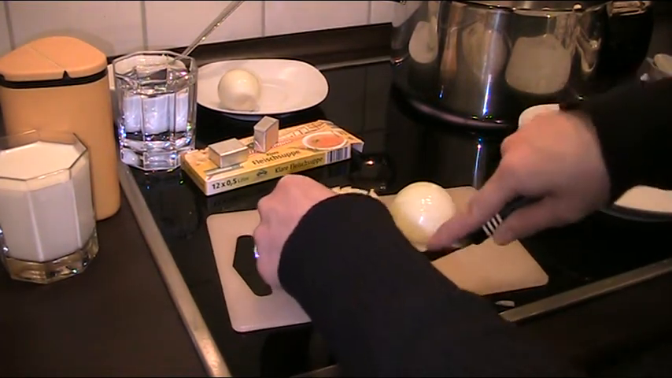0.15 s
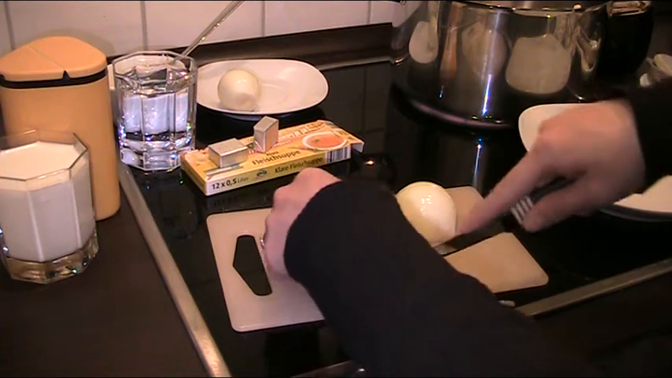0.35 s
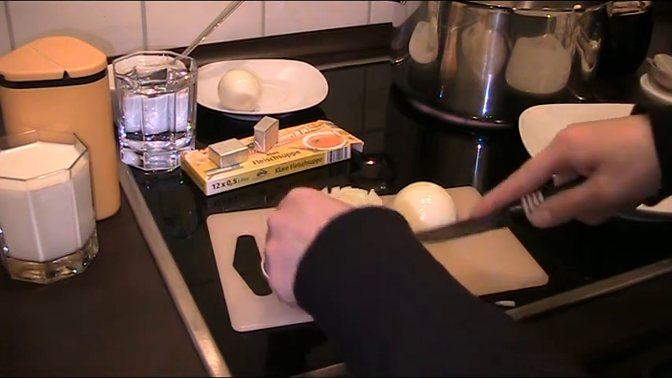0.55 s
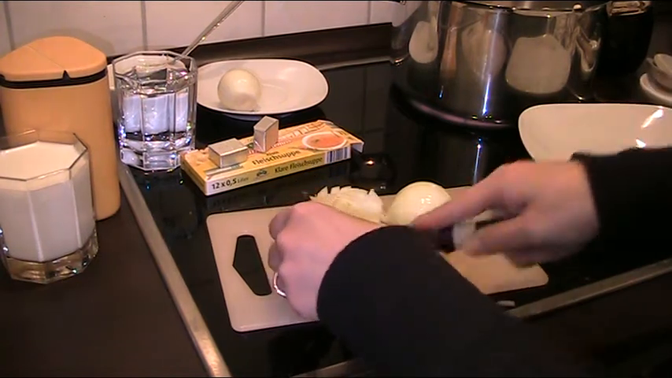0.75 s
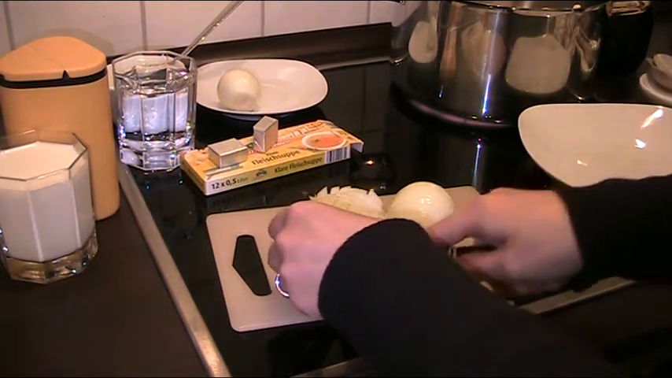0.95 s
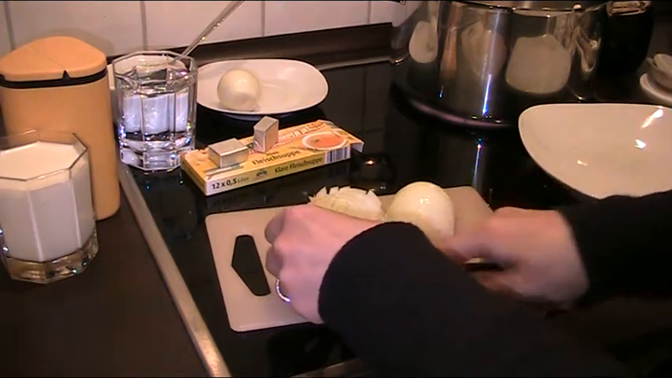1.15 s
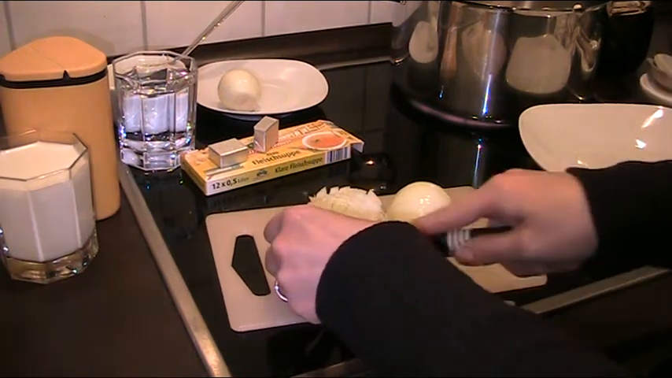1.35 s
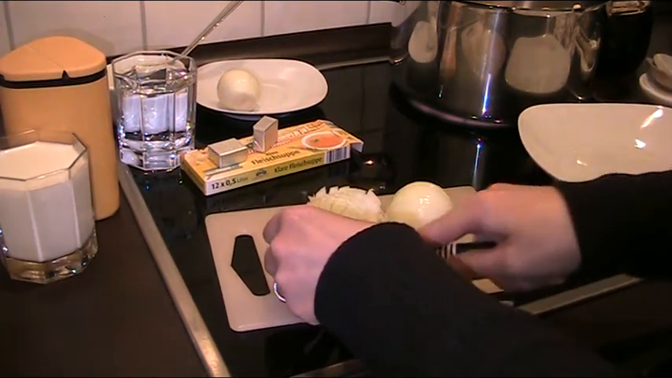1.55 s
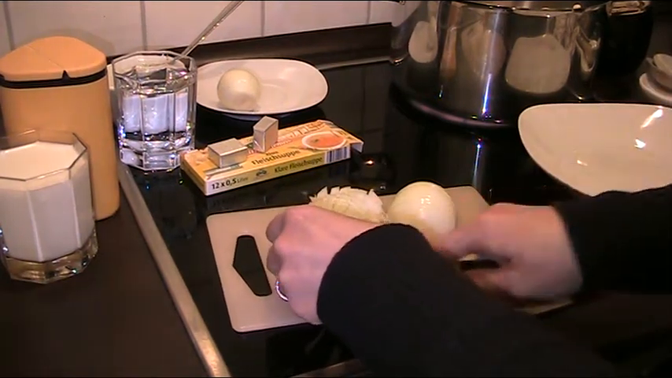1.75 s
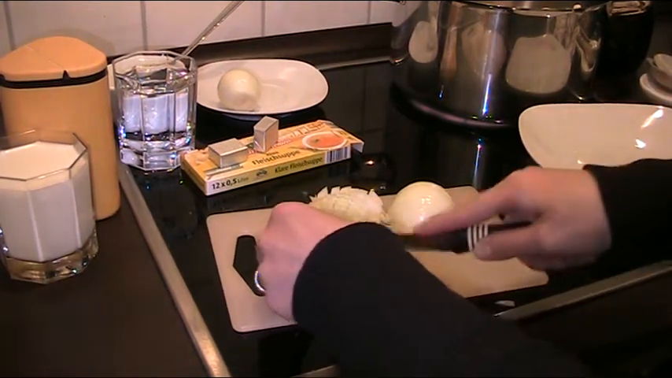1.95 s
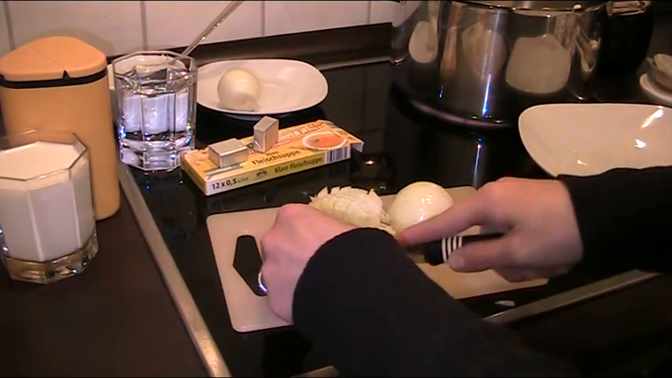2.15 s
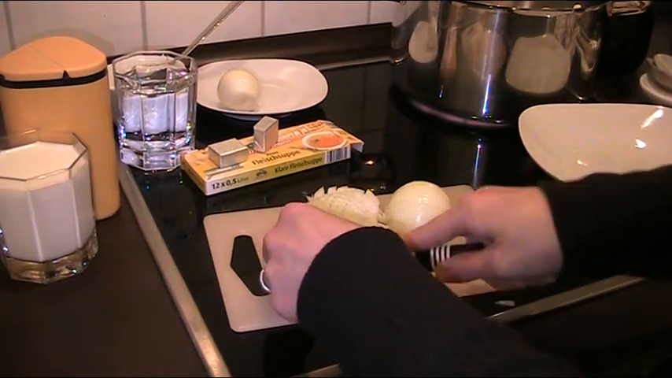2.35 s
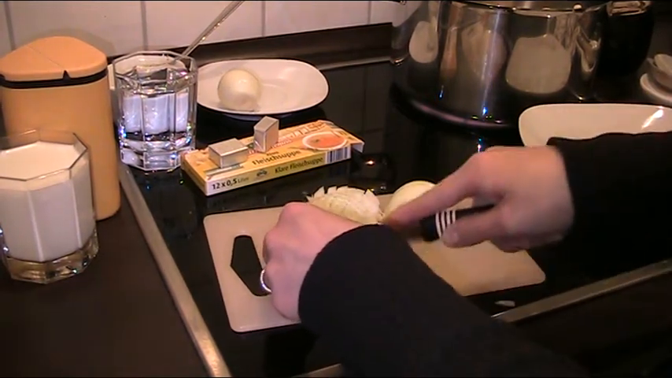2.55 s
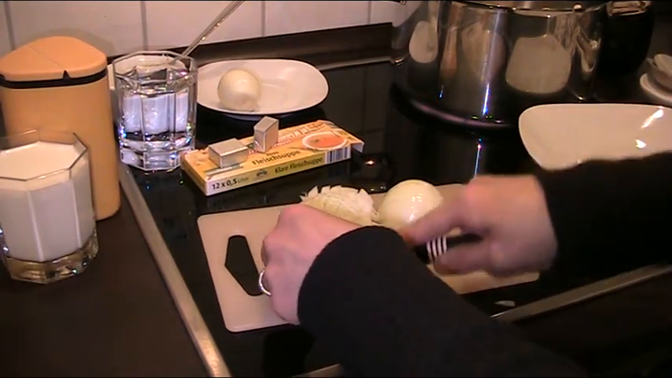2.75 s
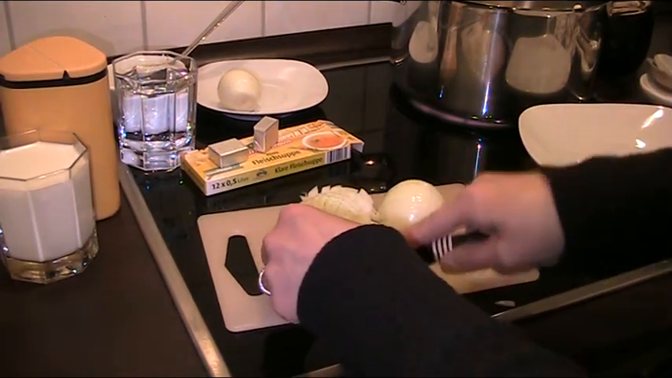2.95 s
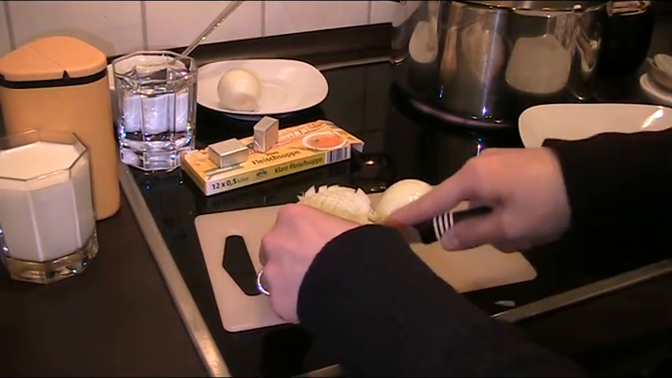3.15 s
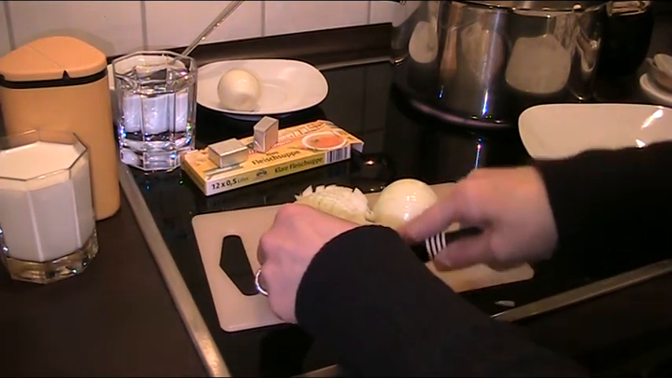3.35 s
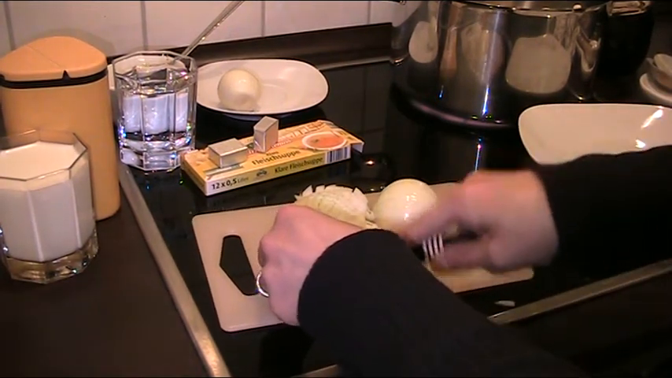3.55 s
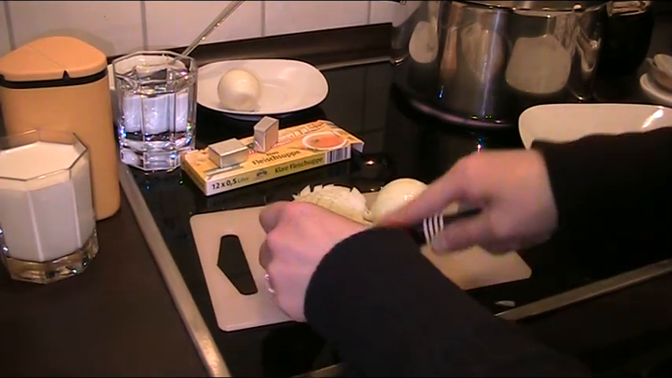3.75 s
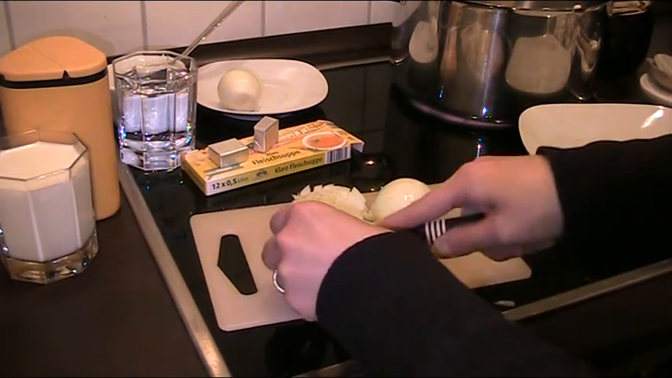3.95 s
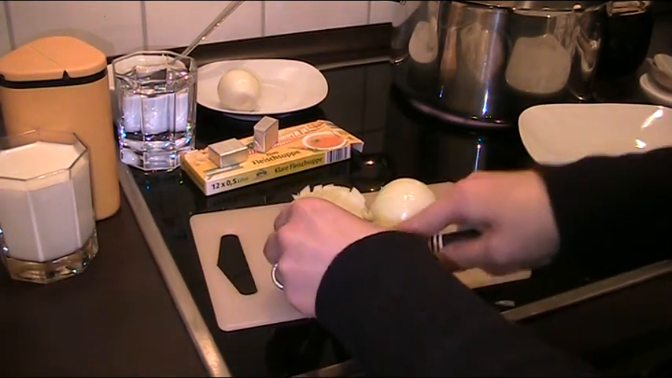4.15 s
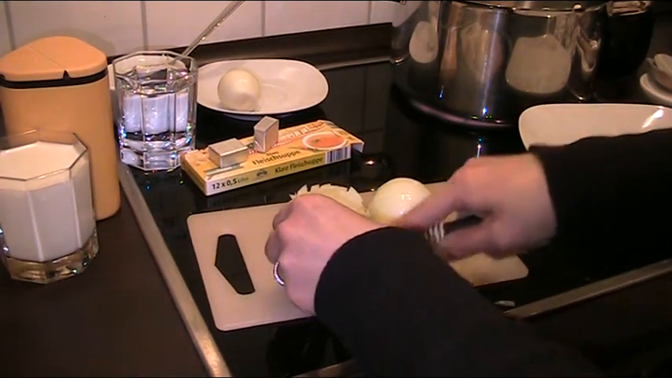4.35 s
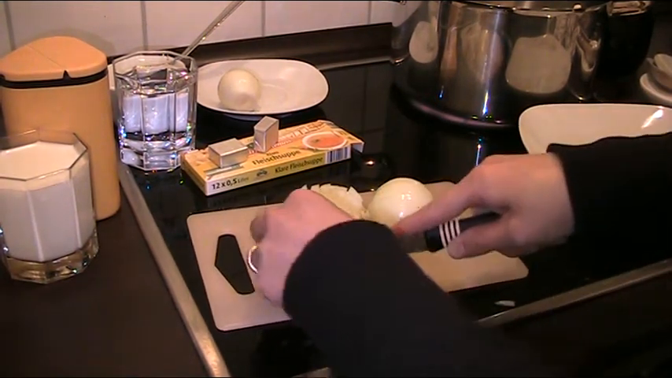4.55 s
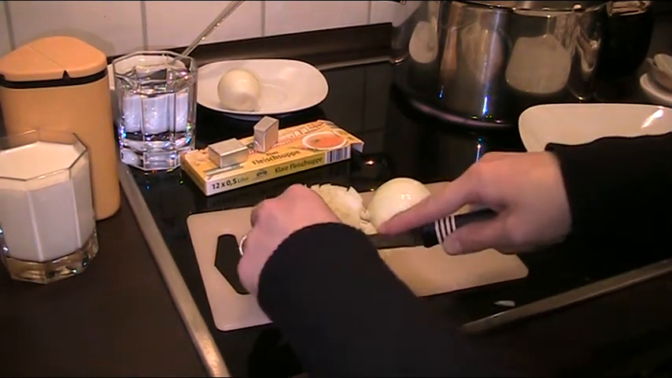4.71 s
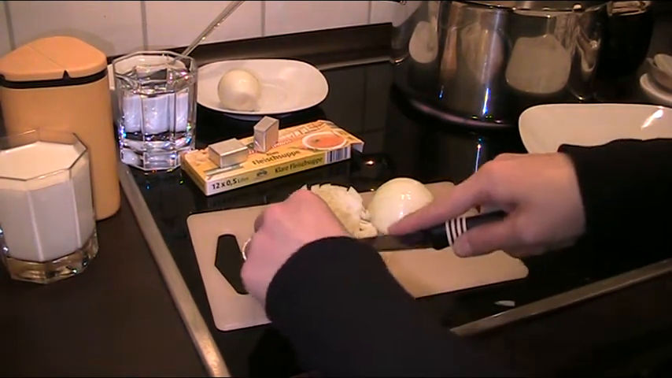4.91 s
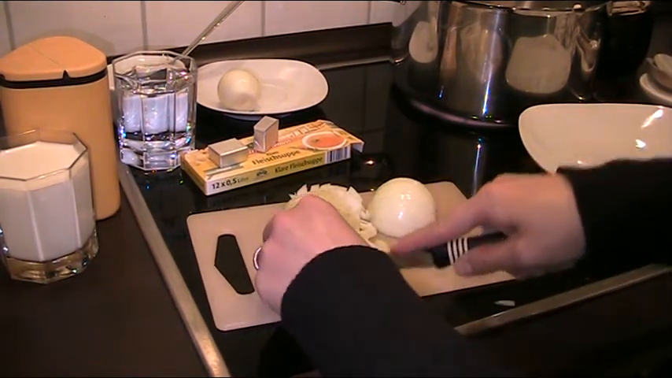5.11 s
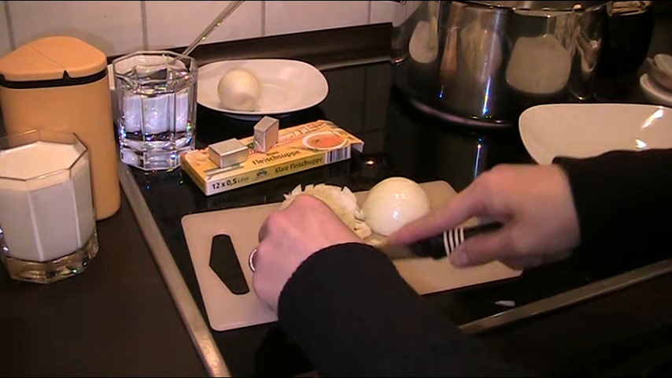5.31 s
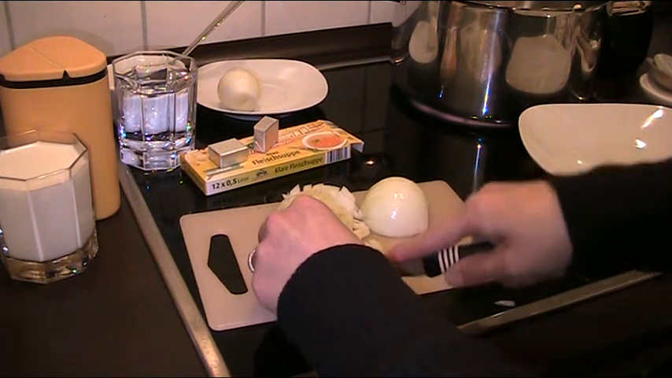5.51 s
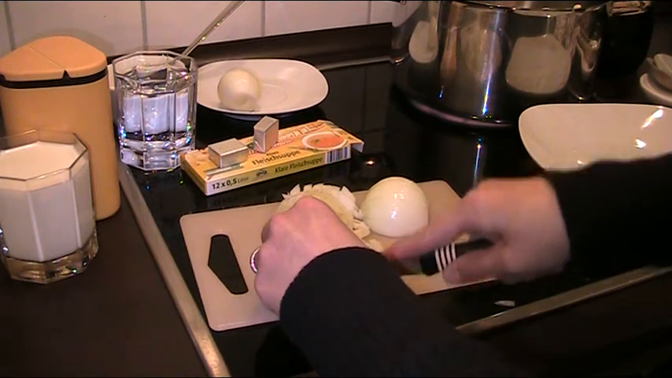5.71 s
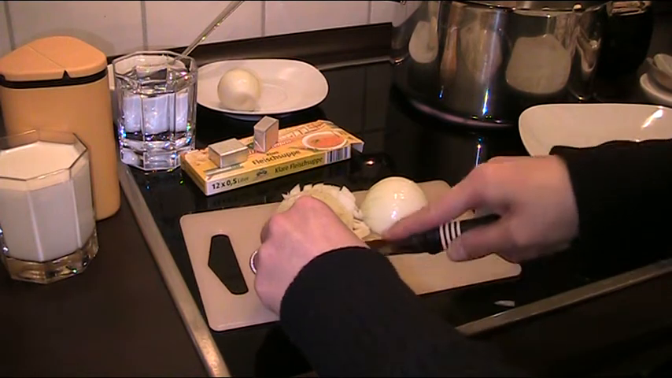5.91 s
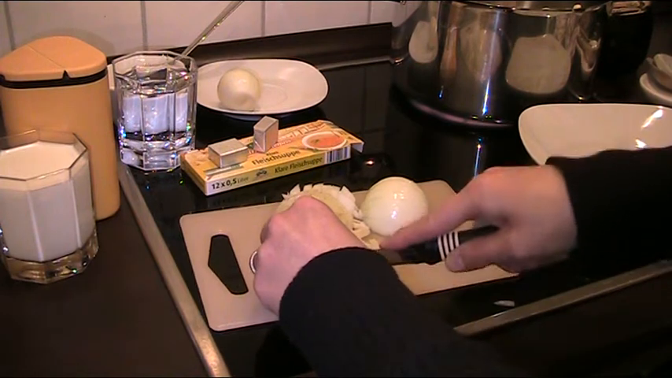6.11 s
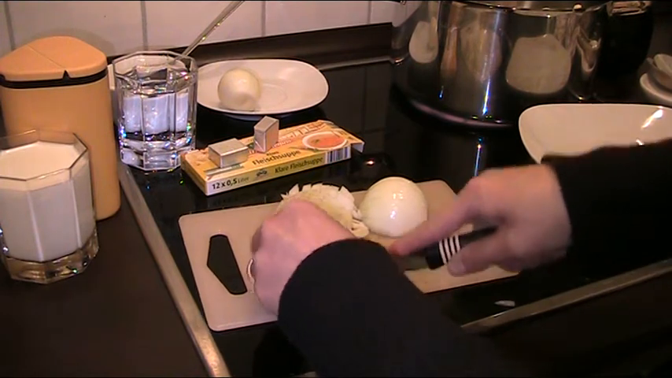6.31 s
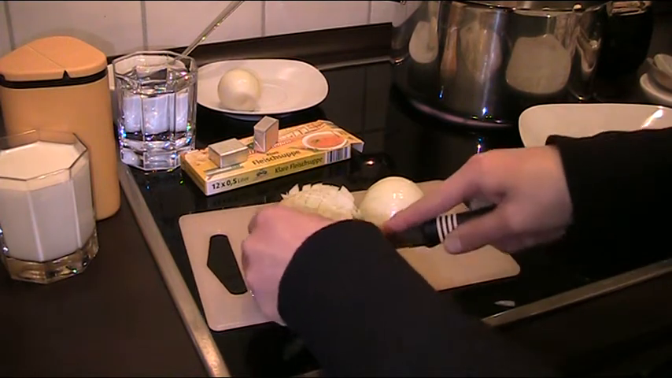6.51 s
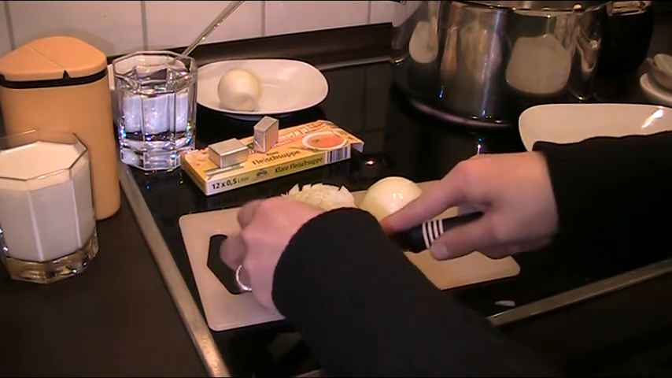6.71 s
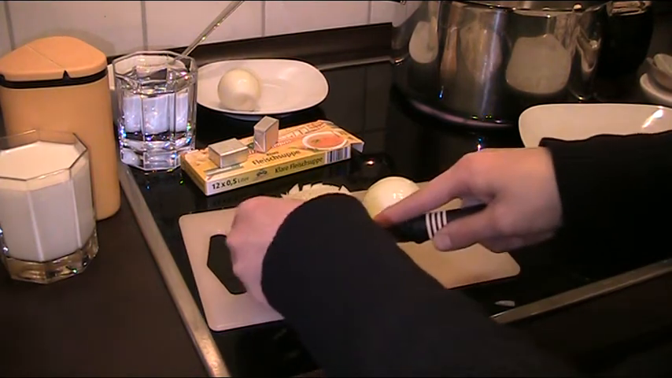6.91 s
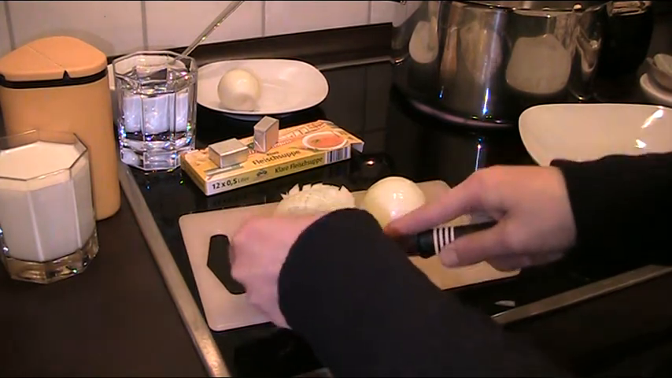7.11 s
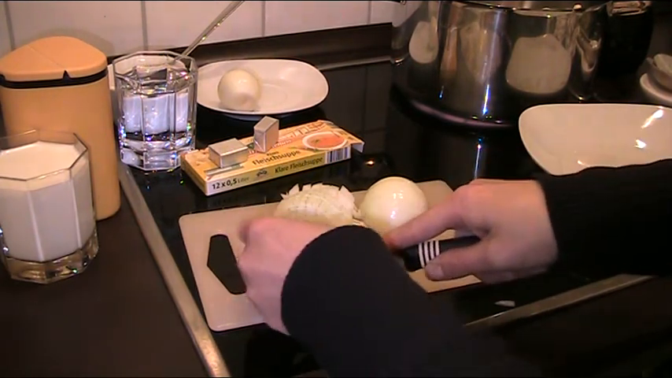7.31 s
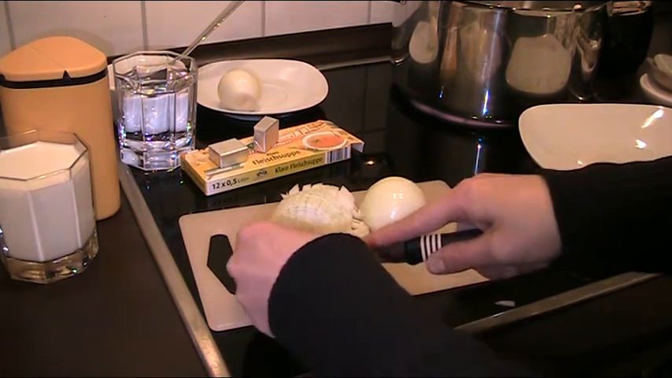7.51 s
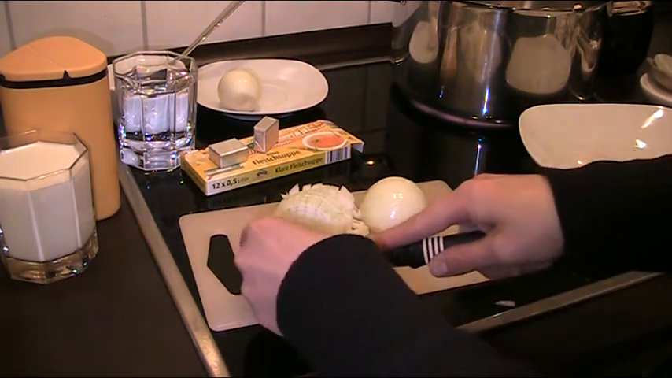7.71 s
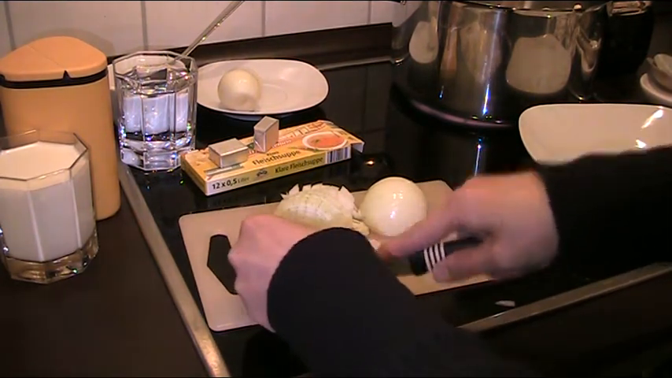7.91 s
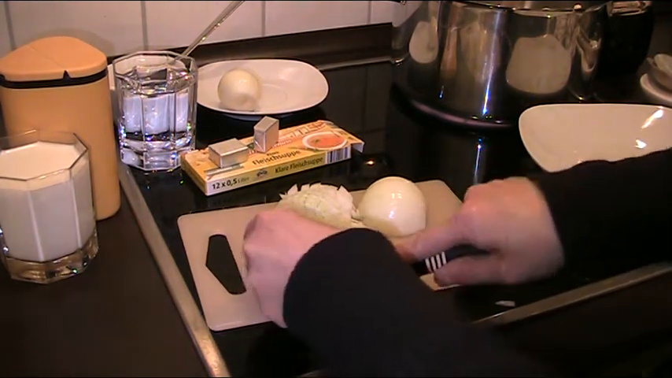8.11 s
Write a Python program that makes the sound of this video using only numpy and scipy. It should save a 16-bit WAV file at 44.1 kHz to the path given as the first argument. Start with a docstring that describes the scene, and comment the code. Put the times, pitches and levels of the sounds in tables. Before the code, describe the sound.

Crisp wet onion cuts end in short hollow knocks on a thin plastic board, with small ticks and rustles between them over faint kitchen hum.

```python
"""A kitchen knife dices an onion on a plastic board that lies on a glass hob, heard from close by.
In each cut, runs of tiny clicks crunch through three layers; then dying tones make the knock on the board.
Long tones of the hob and a low rumble ring on, and noise shaped by the sound makes the kitchen's echo.
Between cuts the blade ticks and fingers shift the pieces, as small sprays and runs of clicks.
Shaped noise gives a faint hiss; steady sine tones give a mains hum and an appliance that soon stops."""
import sys
import numpy as np
from scipy import signal
from scipy.fft import rfft, irfft, next_fast_len
from scipy.io import wavfile
from scipy.ndimage import uniform_filter1d

SR = 44100
rng = np.random.default_rng(int(sys.argv[2]) if len(sys.argv) > 2 else 0)


def output_pcm(signal):
    """Save a mono or channel-first signal as 16-bit PCM at the path in sys.argv[1].

    Samples are clipped to [-1, 1] before scaling.
    """
    pcm = np.clip(np.atleast_2d(signal).T, -1, 1) * 32767
    wavfile.write(sys.argv[1], SR, np.round(pcm).astype(np.int16))


N = 364697  # length in samples

# The colour of one bursting onion cell. Each row: frequency in Hz, relative level in dB.
CELL_COLOUR = [(30, -0.5), (200, -15), (600, 2), (1300, 7.5), (2100, 3), (2700, -2.5), (4000, 1.5),
               (4900, -5), (6300, -2), (8800, -2), (10500, -13.5), (15500, -22.5)]
# The blade chops through the onion and lands on the board. Each row: landing in seconds, force in dB,
# pitch as a factor on the board's tones, extra weight of the low thud in dB, travel through the onion
# in seconds, crunch of the last layer in dB, growth from layer to layer in dB.
CHOPS = [(0.0359, -8.5, 0.84, 5, 0.034, -34.5, 18), (0.3996, -11.5, 0.9, -2.5, .05, -43, 9),
         (1.0793, -10.5, 1.02, 2, .03, -42.5, 10), (1.6972, -8.5, 1.086, 1.5, .03, -36, 14),
         (2.2825, -4, 1.065, 0, 0.036, -35, 4), (2.6213, -1.5, 1.08, -1, 0.029, -37, 3.5),
         (2.9387, 1.5, 1.096, -3, .036, -28, 8), (3.2435, 1.5, 1.053, -3, 0.05, -25.5, 10),
         (3.5475, 1, 1.037, -2, 0.063, -25.5, 10.5), (4.1683, -2.5, 1.05, -.5, .057, -25.5, 8),
         (5.1228, -1.5, 1, -2, .036, -35.5, 3), (5.4176, -13, 1.03, 4.5, 0.059, -30.5, 11),
         (5.675, -26.5, 0.79, 13.5, 0.039, -44.5, 11), (6.1528, 4, 1.016, -2.5, 0.057, -22.5, 19),
         (7.8982, -4.5, 0.99, 1, 0.052, -27, 16.5)]


def amp(db):
    """Turns decibels into a gain."""
    return 10 ** (np.asarray(db) / 20)


def evened(x):
    """Scales a sound to an rms level of 1."""
    return x / np.sqrt(np.mean(x ** 2) + 1e-20)


def read(points, hz):
    """Reads a table between its points, along a logarithmic frequency axis."""
    f, value = np.transpose(points)
    return np.interp(np.log(hz + 1), np.log(f + 1), value)


def add(mix, s, sound):
    """Mixes a sound in at time s in seconds."""
    part = mix[max(round(s * SR), 0):][:len(sound)]
    part += sound[:len(part)]


def tint(x, points):
    """Colours a sound by raising or lowering each frequency as the table says."""
    size = next_fast_len(len(x))
    gain = amp(read(points, np.fft.rfftfreq(size, 1 / SR)))
    return irfft(rfft(x, size) * gain, size)[:len(x)]


def click(points, size=1024):
    """The most compact click with a given colour: minimum phase, of energy 1."""
    log_gain = np.log(amp(read(points, abs(np.fft.fftfreq(size, 1 / SR)))))
    pulse = np.fft.ifft(np.exp(np.conj(signal.hilbert(log_gain)))).real
    return pulse / np.linalg.norm(pulse)


def ring(modes, length, contact, pitch=1, thud_db=0):
    """A struck thing sounds as dying tones, which set in over a short contact time in seconds."""
    t = np.arange(int(length * SR)) / SR
    waves = np.zeros(len(t))
    for hz, db, t60 in modes:
        level_db = db + thud_db * (hz < 1000)  # the thud is what lies below 1000 Hz
        decay = np.exp(-np.log(1000) * t / t60)
        waves += amp(level_db) * decay * np.cos(2 * np.pi * hz * pitch * t)
    return waves * (1 - np.exp(-t / contact))


def bursts(length, per_s, spread_db, edge, swell_db=0, clump_db=0):
    """A run of random tiny clicks, a few much larger than the rest, with swells of about 2 ms."""
    count = int(length * SR)
    chance, size, sign, clumps = rng.random((count, 4)).T
    sizes_db = spread_db * np.minimum(-np.log(1 - size), 4)
    sizes_db += clump_db * evened(uniform_filter1d(clumps - .5, size=100))
    sizes_db += np.linspace(0, swell_db, count)
    train = (chance < per_s / SR) * amp(sizes_db) * np.sign(sign - .5)
    return evened(train * signal.windows.tukey(count, edge))


def background():
    """Mid and side of the hiss, with mains hum and the steady tone of an appliance that soon fades out."""
    # Colour of the hiss. Each row: frequency in Hz, relative level in dB per Hz.
    hiss_colour = [(15, -39), (25, -3), (55, -2.5), (96, -6.5), (204, 1), (684, -6.5), (782, -4),
                   (1020, -10.5), (1750, -11), (2850, -14), (3340, -14.5), (5430, -19), (8350, -18),
                   (10100, -25.5), (15500, -31.5)]
    # Width of the hiss. Each row: frequency in Hz, side against mid in dB.
    hiss_width = [(25, 2.5), (60, -0.5), (300, 0.5), (1000, 3.5), (4000, 2), (12000, -0.5)]
    # Tones of the hum. Each row: frequency in Hz, rms level in dB.
    hum_tones = [(49.3, -72.5), (100, -72.5), (247.6, -77), (366.1, -74.5), (495.3, -76.5), (786, -76.5)]
    hiss_db = -60
    drone_hz, drone_db, stop_s, drone_t60_s = 310, -61.5, 2.2, .7
    t = np.arange(N) / SR
    mid, side = (amp(hiss_db) * evened(tint(noise, hiss_colour)) for noise in rng.standard_normal((2, N)))
    hum = sum(amp(db) * np.sin(2 * np.pi * (hz * t + rng.random())) for hz, db in hum_tones)
    fade = np.exp(-np.log(1000) * np.maximum(t - stop_s, 0) / drone_t60_s)
    drone = amp(drone_db) * fade * np.sin(2 * np.pi * drone_hz * t)
    return mid + np.sqrt(2) * (hum + drone), tint(side, hiss_width)  # root 2 turns rms into peak


def clack(pitch, thud_db, contact, low_hz=170):
    """The board's short answer to one blow; so small a plate radiates little bass."""
    # Tones of the board, damped by hand and onion.
    # Each row: frequency in Hz at pitch 1, relative level in dB, time to fall by 60 dB in seconds.
    board_modes = [(436, -8.5, 0.017), (940, -25.5, .012), (1364, -24, 0.021), (1695, 1, 0.0089),
                   (1824, -3.5, 0.003), (2170, -61.5, 0.0075), (3360, -16.5, 0.012), (4187, -51.5, 0.0032),
                   (8600, -26.5, .003)]
    high_pass = signal.butter(2, low_hz, "high", fs=SR, output="sos")
    return signal.sosfilt(high_pass, ring(board_modes, .04, contact, pitch, thud_db))


def crunch_rows():
    """Each broken layer or slice: start s, length s, level dB, board share dB, swell dB."""
    # Three layers break in every chop: the outer two crack and die, the last swells into the landing.
    # Each row: share of the travel still to go, length in seconds, share that shakes the board in dB,
    # swell from start to end in dB.
    layers = [(1.0, .011, 3.5, -5), (.74, .012, 1, -3.5), (.24, 0.01593, -2, 7)]
    # The blade is pushed slowly through the flesh. Each row: start in seconds, length in seconds,
    # level in dB, share that shakes the board in dB.
    slow_slices = [(.227, 0.017, -46, 5), (0.418, 0.034, -38, 5), (0.928, 0.04, -43, 1),
                   (0.99, 0.043, -36.5, -0.5), (1.541, 0.048, -43, -3.5), (1.576, 0.065, -36, -4.5)]
    slice_swell_db = 2.5  # a slow slice presses a little harder towards its end
    rows = []
    for s, _, _, _, travel, crunch_db, growth_db in CHOPS:
        for layers_left, (to_go, length, board_db, swell_db) in enumerate(reversed(layers)):
            level_db = crunch_db - growth_db * layers_left
            rows.append((s - to_go * travel, length, level_db, board_db, swell_db))
    return rows + [(*row, slice_swell_db) for row in slow_slices]


def crunches():
    """Cells burst in runs amid a faint creak; the blade carries part of each burst into the board."""
    creak_lead_s, creak_db = 0.0069, -14.5  # the flesh creaks just before and after it gives way
    cells, push = np.zeros((2, N))
    for s, length, db, board_db, swell_db in crunch_rows():
        creak = bursts(length + 2 * creak_lead_s, per_s=4100, spread_db=1.5, edge=0.45)
        add(cells, s - creak_lead_s, amp(db + creak_db) * creak)
        crunch = bursts(length, per_s=4100, spread_db=1.5, edge=0.28, swell_db=swell_db, clump_db=2.5)
        add(cells, s, amp(db) * crunch)
        shake = bursts(length, per_s=3000, spread_db=0.0, edge=0.25, swell_db=swell_db / 2, clump_db=1.2)
        add(push, s, amp(db + board_db) * shake)
    body = clack(pitch=0.92, thud_db=0.5, contact=0.00096)
    wet = signal.oaconvolve(cells, click(CELL_COLOUR))[:N]
    return wet + signal.oaconvolve(push, body / np.linalg.norm(body))[:N]


def splutter(fade):
    """The wet spray of clicks that follows a contact, of energy 1; fade is in seconds."""
    spray = bursts(.02, per_s=6300, spread_db=6.5, edge=0)
    t = np.arange(len(spray)) / SR
    spray *= np.exp(-t / fade) * (1 - np.exp(-t / 0.00019))
    return spray / np.linalg.norm(spray)


def knock_rows():
    """Everything that strikes the board: time s, force dB, pitch factor, thud dB."""
    # The blade bumps the board or the onion on it without cutting through.
    # Each row: time in seconds, force in dB, pitch factor, extra weight of the low thud in dB.
    light_bumps = [(0.2159, -23, 0.76, -1), (1.8398, -26, 0.87, -9), (2.443, -20, 1.12, -10),
                   (2.7824, -25, 1, -17), (5.3747, -20, .78, 6), (6.1095, -15.5, 0.8, -5),
                   (8.1958, -26, 1, 2)]
    return [cut[:4] for cut in CHOPS] + light_bumps


def knocks():
    """Each landing gives a short hollow clack and crushes the last skin; the hob rings and rumbles under it."""
    # Long resonances of hob and room. Each row: frequency in Hz, level in dB before the shared hob_db.
    hob_modes = [(43, -52), (165, -47), (228, -45), (248, -45), (283, -45), (365, -38), (411, -40),
                 (456, -36), (697, -46), (862, -45), (1147, -45), (1202, -45), (1287, -43), (1550, -39),
                 (1599, -39), (1660, -39), (1727, -38), (1857, -38), (1963, -38), (2113, -44), (2401, -47),
                 (2809, -50)]
    # Hob and cupboard shaken by a knock. Each row: frequency in Hz, relative level in dB.
    rumble_colour = [(15, -19), (42, -3.5), (62, -10.5), (90, 1), (135, -8), (170, 0.5), (300, -8.5),
                     (900, -68)]
    hob_t60_s, hob_db = 0.54, -2
    skin_db, skin_growth = -2.5, .78  # wet snap: dB at a force of 0 dB, dB per dB of force
    board, skin, hob = np.zeros((3, N))
    t = np.arange(SR) / SR
    ringing = ring([(hz, db + hob_db, hob_t60_s) for hz, db in hob_modes], 1, contact=0.0008)
    for s, force_db, pitch, thud_db in knock_rows():
        add(board, s, amp(force_db) * clack(pitch, thud_db, contact=0.00043))
        add(skin, s, amp(skin_db + skin_growth * force_db) * splutter(fade=0.0014))
        rumble = evened(tint(rng.standard_normal(SR), rumble_colour))
        rumble *= amp(-46.5) * np.exp(-t / 0.07) * (1 - np.exp(-t / .01))
        add(hob, s, amp(force_db + thud_db / 2) * (ringing + rumble))
    return board + hob + signal.oaconvolve(skin, click(CELL_COLOUR))[:N]


def handling():
    """Wet ticks, settling crumbs and rustling pieces are runs of clicks; the blade pings once as dying tones."""
    # Light ticks of blade and onion pieces. Each row: time in seconds, strength in dB before colouring.
    light_ticks = [(.811, -21.5), (.9, -20), (1.547, -18), (3.708, -28), (4.5093, -24.5), (4.536, -21),
                   (4.7233, -25.5), (6.315, -11.5), (6.346, -15.5), (7.1, -14), (7.207, -25.5),
                   (8.141, -21), (8.1957, -8)]
    # Fingers and blade shift the pieces.
    # Each row: start in seconds, length in seconds, level in dB before colouring.
    shifts = [(0.133, 0.056, -56.5), (0.662, 0.07, -53.5), (0.788, 0.48, -53.5), (3.674, .073, -45),
              (4.701, .057, -57), (6.807, 0.077, -57.5), (7.156, 0.4, -62.5), (7.206, .075, -54),
              (7.317, 0.036, -55), (7.8, 0.096, -52), (8.204, 0.036, -56)]
    # The ping: its time in seconds, then its tones.
    # Each row of tones: frequency in Hz, level in dB, time to fall by 60 dB in seconds.
    ping_s, ping_modes = (7.5763, [(3100, -42.5, 0.02), (3400, -46.5, 0.013)])
    crumbs_per_s, crumbs_db, crumbs_spread_db = 3, -31.5, 2  # fainter ticks at random times
    ticks, rustle, ping = np.zeros((3, N))
    crumbs = []
    for _ in range(int(crumbs_per_s * N / SR)):
        crumbs.append((rng.uniform(0, N / SR), rng.normal(crumbs_db, crumbs_spread_db)))
    for s, db in light_ticks + crumbs:
        add(ticks, s, amp(db) * splutter(fade=0.002))
    for s, length, db in shifts:
        add(rustle, s, amp(db) * bursts(length, per_s=2200, spread_db=1.5, edge=0.4, clump_db=5.5))
    add(ping, ping_s, ring(ping_modes, .05, contact=0.00075))
    thin = tint(ticks + rustle, [(200, -5), (1000, -10.5), (2500, -3.5), (8000, -3)])
    return signal.oaconvolve(thin, click(CELL_COLOUR))[:N] + ping


def linger(power, t60, hop):
    """Spreads the power of one band over an exponential decay, keeping its energy."""
    keep = 10 ** (-6 * hop / SR / t60)
    return signal.lfilter([1 - keep], [1, -keep], power)


def diffuse(x, early_db=-2.5, early_t60=0.079, delay=.003, blur=0.069, size=256):
    """Two diffuse fields: early reflections off worktop and wall, and a tail that dies band by band."""
    # Each row: frequency in Hz, time for the tail to fall by 60 dB in seconds.
    tail_t60 = [(60, .9), (250, .7), (500, 0.64), (1800, 0.74), (4000, 0.64), (8000, .45), (15000, 0.27)]
    hop = size // 4
    frame = dict(fs=SR, nperseg=size, noverlap=size - hop)
    hz, _, z = signal.stft(x, **frame)
    # sound leaves the blade in all directions, so the fine ripple of its spectrum evens out in the room
    near = np.exp(-(np.log((hz[:, None] + 1) / (hz + 1)) / blur) ** 2)
    smooth = near / near.sum(1, keepdims=True) @ abs(z) ** 2
    power = []
    for band, t60 in zip(smooth, read(tail_t60, hz)):
        early = amp(early_db) ** 2 * linger(band, early_t60, hop)
        power.append(linger(band, t60, hop) + early)
    echo = np.zeros((2, len(x)))
    for channel in echo:
        field = signal.stft(rng.standard_normal(len(x)), **frame)[2]
        field *= np.sqrt(np.array(power) / np.mean(abs(field) ** 2))
        add(channel, delay, signal.istft(field, **frame)[1])
    return echo


def kitchen(x, scattered_db=-5.5, steady_db=-2):
    """Mid and side of the echo: part is scattered anew at each cut, part always follows the same paths."""
    # Colour of the echo. Each row: frequency in Hz, gain in dB.
    echo_colour = [(40, -10), (90, -4), (140, -8.5), (230, 2), (330, -2), (470, 1), (650, -1.5), (1150, -5),
                   (1800, -8), (2600, -3), (3700, -4.5), (7000, -6), (10000, -11.5), (15000, -7.5)]
    # Width of the echo. Each row: frequency in Hz, side against mid in dB.
    echo_width = [(60, -11), (300, -25.5), (1000, -13.5), (2000, -8.5), (4000, -4.5), (8000, -3.5),
                  (13000, 10)]
    paths = diffuse(signal.unit_impulse(SR))
    steady = signal.oaconvolve(x[None], paths, axes=1)[:, :N]
    mid, side = amp(scattered_db) * diffuse(x) + amp(steady_db) * steady
    return tint(mid, echo_colour), tint(tint(side, echo_colour), echo_width)


def scene():
    """Mixes all layers in stereo; the board lies a little left of the microphone's axis."""
    hiss, hiss_side = background()
    direct = crunches() + knocks() + handling()
    echo, echo_side = kitchen(direct)
    mid = direct + echo
    side = echo_side + hiss_side
    balance_db = 1.5  # left against right
    left = mid * amp(balance_db / 2) + hiss + side
    right = mid * amp(-balance_db / 2) + hiss - side
    return np.array([left, right])


def record(dry):
    """The hardest knocks overload softly; then a low-pass filter removes the highest treble."""
    squeezed = dry / (1 + dry ** 6) ** (1 / 6)
    low_pass = signal.firwin(511, 15850, window=("kaiser", 9), fs=SR)  # edge in Hz
    return signal.oaconvolve(squeezed, low_pass[None], "same")


dry = scene()
out = record(dry)
output_pcm(out)
```